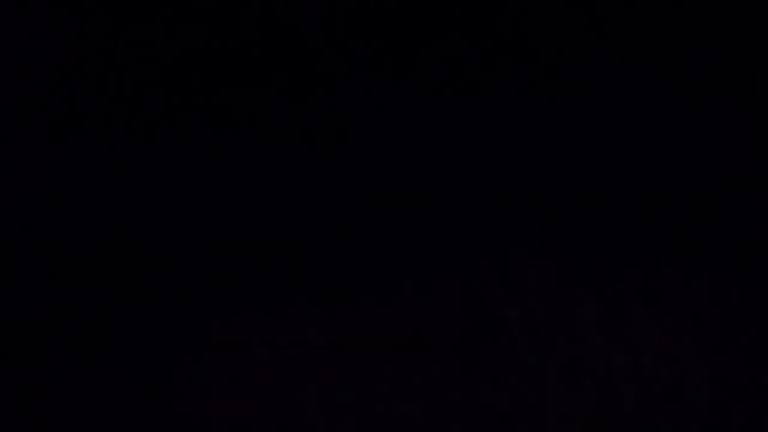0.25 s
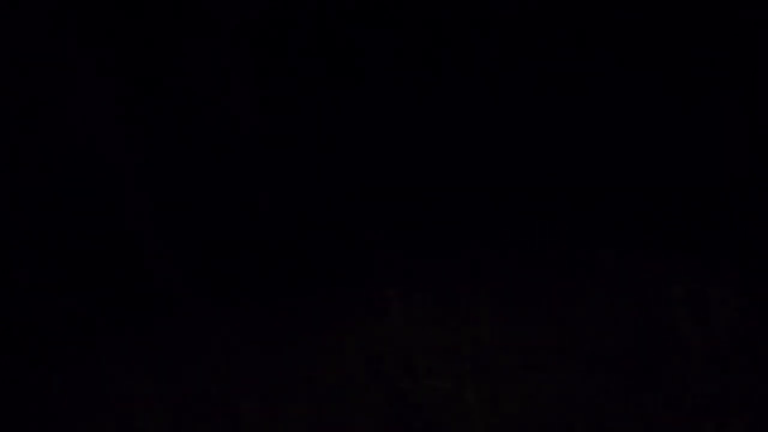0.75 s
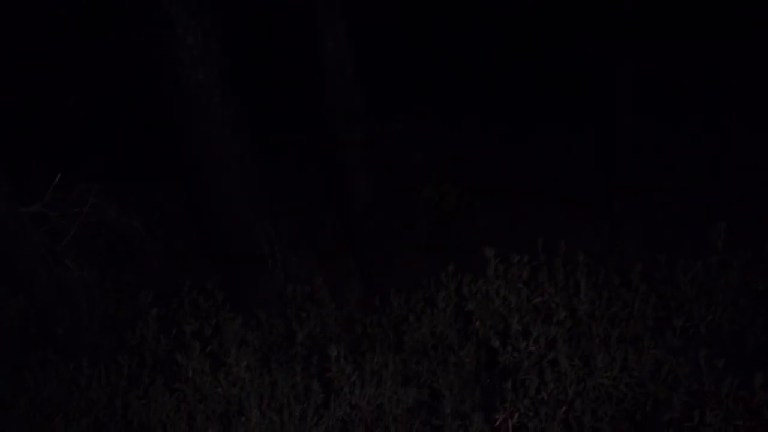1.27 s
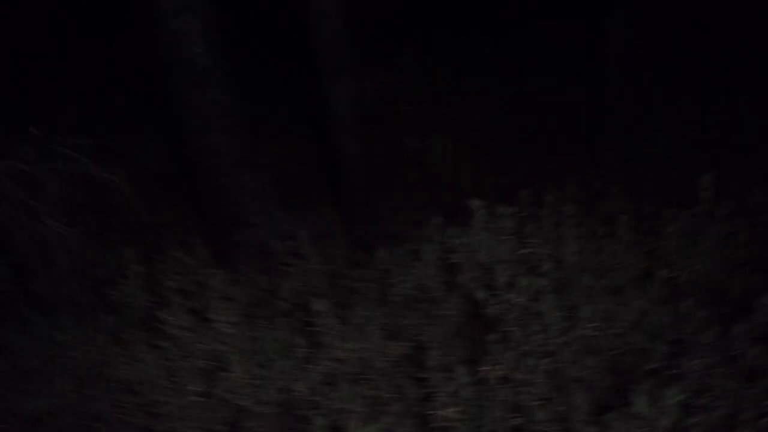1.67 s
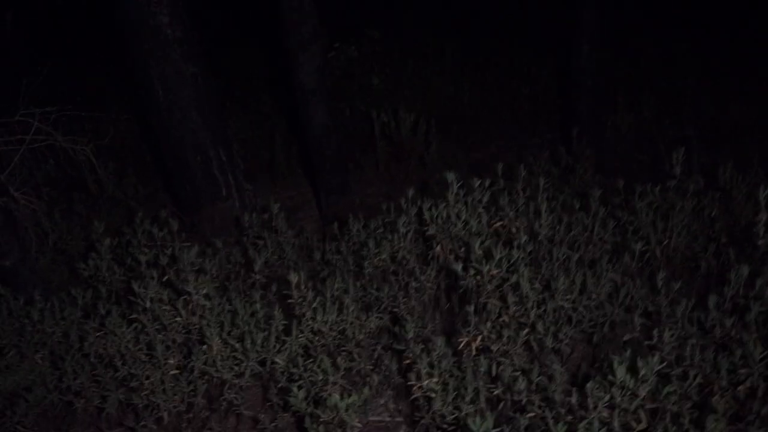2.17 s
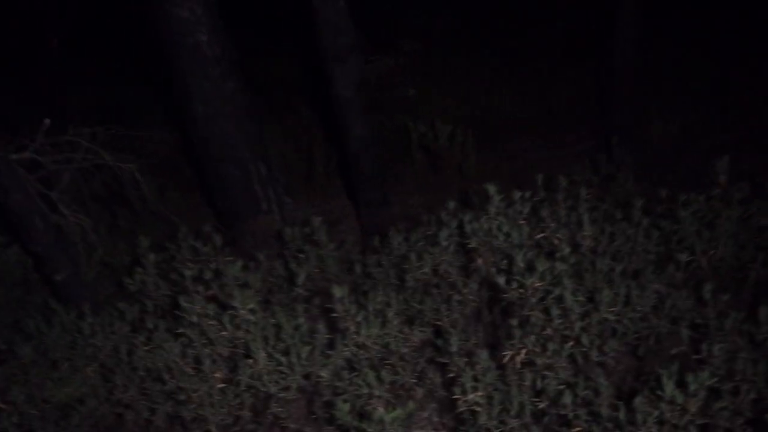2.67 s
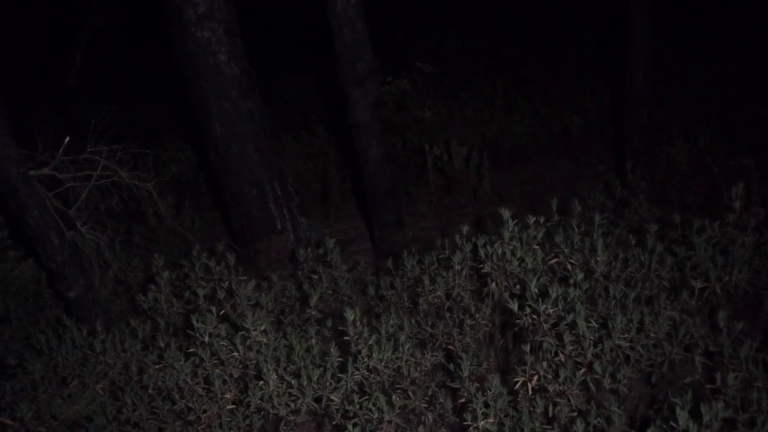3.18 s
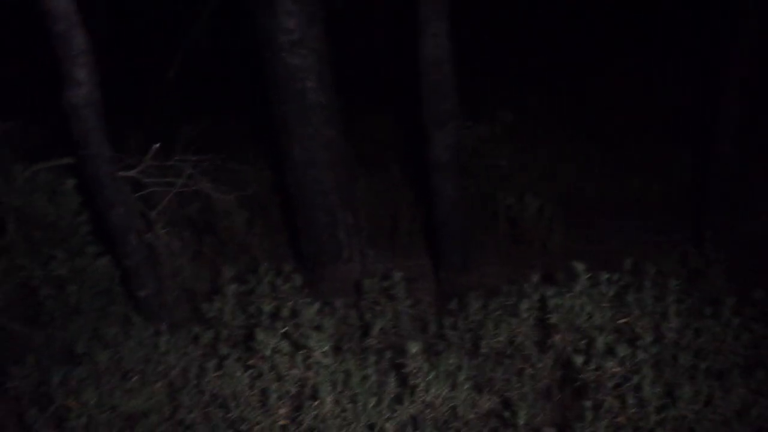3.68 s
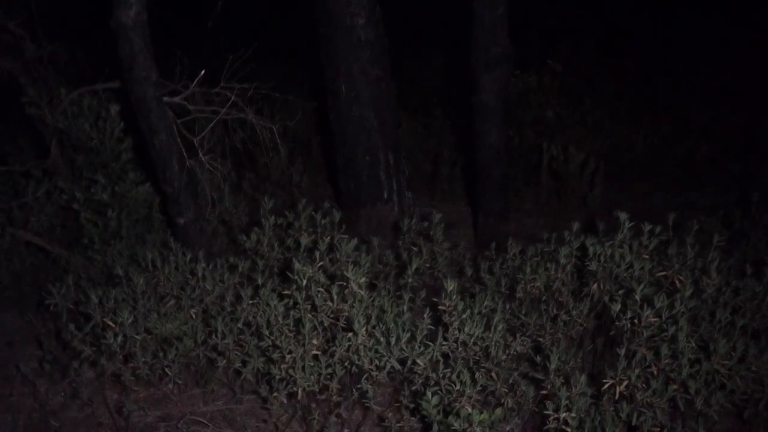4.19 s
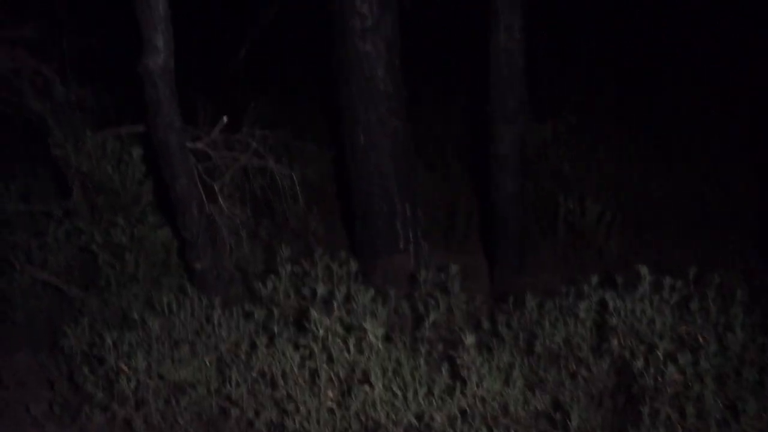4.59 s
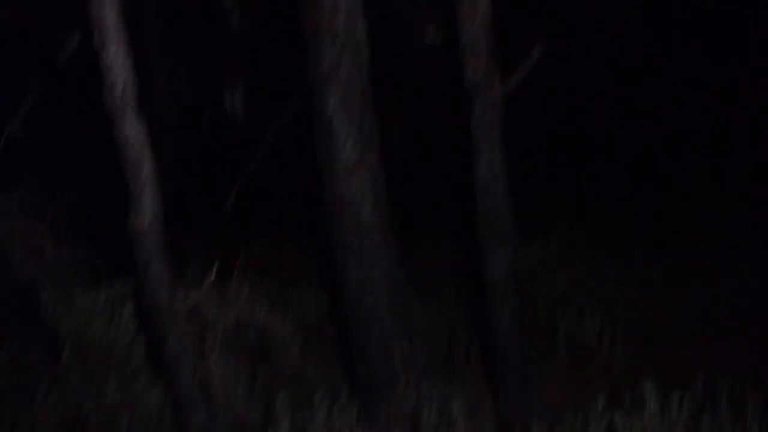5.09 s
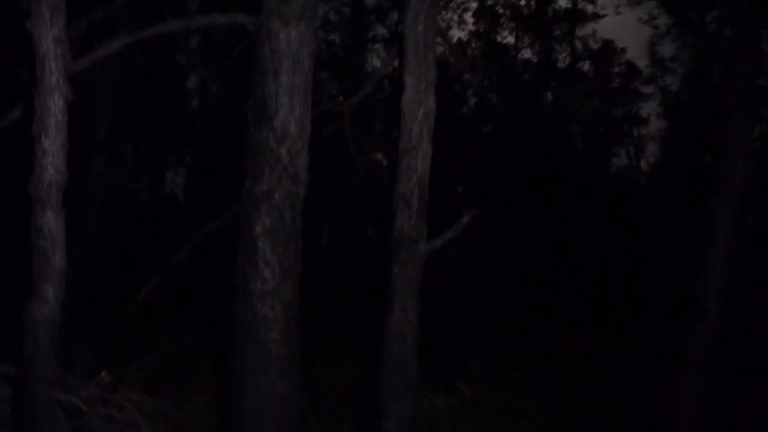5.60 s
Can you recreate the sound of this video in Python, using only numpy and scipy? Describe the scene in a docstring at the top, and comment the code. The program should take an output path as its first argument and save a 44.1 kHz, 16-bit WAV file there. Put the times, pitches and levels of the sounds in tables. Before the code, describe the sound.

Handheld camera thumps, knocks and plastic clicks in a quiet night forest, with faint leaf crackle over soft air hiss.

```python
"""Night steps in low brush, camera in hand

Someone steps slowly through low brush in a quiet forest at night, with the microphone in the hand-held camera.
Steps and shifts of grip thump through its body as low swings that sag in pitch; the hand trembles and rubs.
The plastic case knocks, clicks and rattles in short ringing modes, and hisses under a sliding finger.
Twigs and leaves crackle faintly as coloured random grains over air and hiss; trunks return a dull tail."""
import sys
import numpy as np
from scipy import signal
from scipy.fft import rfft, irfft, next_fast_len
from scipy.io import wavfile

SR = 44100
rng = np.random.default_rng(int(sys.argv[2]) if len(sys.argv) > 2 else 0)


def to_wav(sig):
    """Store sig (one row per channel, or 1-D mono) as 16-bit WAV at the path in sys.argv[1].

    Samples outside -1..1 are clipped; the rate is SR.
    """
    pcm = np.clip(np.atleast_2d(sig), -1, 1) * 32767
    pcm = np.round(pcm).astype(np.int16)
    wavfile.write(sys.argv[1], SR, pcm.T)  # frames by channels


N = 257929  # samples

# soft blows through the camera body:
# (time of the crest [s], pitch at the crest [Hz], level of the swing [dB], rise [s], fall by 60 dB [s])
THUMPS = [(0.097,190.4,-32,.019,0.084), (0.159,184,-23,0.0065,0.031), (0.564,192,-32,0.015,.055),
          (0.917,168,-37,0.012,0.079), (1.458,144,-31.5,0.0056,0.043), (1.648,175,-25,.022,0.028),
          (1.759,201,-19.5,0.021,0.093), (1.865,183,-16.5,0.0095,0.078), (1.889,195,-18.5,.018,.037),
          (1.921,203,-21.5,.017,0.051), (2.317,173.6,-30,.025,0.073), (2.472,174,-29.5,0.014,0.09),
          (2.609,66.8,-24.5,0.021,0.45), (2.899,68,-36.5,.06,0.76), (3.073,196,-21,.02,0.086),
          (3.091,143.2,-26,.03,0.21), (3.45,182,-34,0.0085,0.093), (3.672,181,-31,0.012,0.033),
          (3.721,195,-32,.017,0.038), (3.749,50.4,-37.5,0.055,0.37), (4.14,204,-18.5,0.0071,0.14),
          (4.231,175,-31.5,.02,.036), (4.279,180,-12,0.0038,0.047), (4.3,201,-16,.014,.081),
          (4.469,177,-32.5,.02,0.032), (4.519,230,-25.5,0.0045,.05), (4.719,205,-23.5,.018,0.053),
          (4.749,202,-14,0.0029,0.025), (4.772,195,-7.5,0.0052,0.019), (4.779,147,-21,0.0088,0.093),
          (4.794,188,-15,.018,0.07), (4.928,187,-11,.0041,0.023), (4.953,181,-20.5,0.016,0.045),
          (5.088,194,-20,0.0092,0.053), (5.305,197,-27.5,.013,0.033), (5.593,206,-29,.023,0.12),
          (5.677,189,-13,0.0029,0.05), (5.696,198.4,-3,0.015,0.036), (5.726,67.6,-25.5,0.025,0.098)]
# bands of a hard contact, in the order knock, clack, tick: (low edge [Hz], high edge [Hz])
KNOCK_CLACK_TICK_HZ = [(280, 1400), (1400, 4400), (4400, 15000)]

STILL_TREMOR_DB, STILL_DRONE_DB = -51, -53.5  # gains while the hand rests
QUICK_ATTACK_S = 0.014  # onset of a finger's stroke and of the settling after a blow


def from_db(db):
    """Turns decibels into an amplitude ratio."""
    return 10 ** (np.asarray(db) / 20)


def rms_one(x):
    """Scales a signal to an rms of 1."""
    return x / np.sqrt(np.mean(x ** 2) + 1e-20)


def coloured(x, points):
    """Gives a signal a smooth spectrum that falls away beyond its ends; rms 1."""
    hz, db = np.transpose(points)
    size = next_fast_len(N)
    f = np.maximum(np.arange(size // 2 + 1) * SR / size, 1)
    ends = np.minimum(f / hz[0], 1) ** 2 * np.minimum(hz[-1] / f, 1) ** 2
    curve = from_db(np.interp(np.log(f), np.log(hz), db))
    return rms_one(irfft(rfft(x, size) * ends * curve, size)[:N])


def drift(rate):
    """Slow chance with a spread of about 1, heading for a new random value `rate` times a second."""
    knots = rng.standard_normal(4000)
    return np.interp(np.arange(N) / SR * rate, np.arange(len(knots)), knots)


def grains(per_s, spread_db):
    """Random tiny slips or snaps of uneven size; rms 1."""
    born = rng.random(N) < per_s / SR
    size = from_db(spread_db * np.minimum(rng.exponential(1, N), 4))
    return rms_one(born * rng.standard_normal(N) * size)


def add(out, s, sound):
    """Mixes a sound in from a given time on."""
    i = int(np.clip(round(s * SR), 0, N - 1))
    out[i:i + len(sound)] += sound[:N - i]


def gestures(rows, attack_s, t60_s):
    """Gain per sample of (start, length, dB) moves: each swells, holds and dies away; powers add."""
    t, power = np.arange(N) / SR, np.zeros(N)
    for s, length, db in rows:
        i = int(np.clip((s - attack_s) * SR, 0, N))
        j = int(np.clip((s + length + 2 * t60_s) * SR, i, N))
        swell = np.clip(1 + (t[i:j] - s) / attack_s, 0, 1)
        since_release = np.maximum(t[i:j] - s - length, 0)
        power[i:j] += (swell * from_db(db - 60 * since_release / t60_s)) ** 2
    return np.sqrt(power)


def air():
    """Still night air and microphone hiss: steady noise with most of its strength in the mids."""
    # spectrum: (frequency [Hz], level [dB])
    colour = [(150,-22), (300,-3), (500,3.5), (800,-2), (1500,-1), (2200,-7.5), (3700,-11), (8400,-15),
              (15200,-20), (16000,-29)]
    return from_db(-58) * coloured(rng.standard_normal(N), colour)


def grip(attack_s=0.051, t60_s=0.33, settle_db=-24, settle_t60_s=0.22):
    """Gains of tremor and drone: a resting level and shifts of hold; the drone also settles after each blow."""
    # the hand shifts its hold: (start [s], length [s], tremor gain [dB], drone gain [dB])
    shifts = np.array([(0,0.4,-37.5,-44), (1.204,0.018,-50,-50), (1.621,0.095,-38.5,-40.5),
                       (1.894,0.038,-33.5,-32), (2.091,0.041,-44,-44), (2.285,0.077,-43.5,-46),
                       (2.524,0.17,-43.5,-42.5), (2.725,0.25,-43.5,-48.5), (3.077,0.024,-37,-43),
                       (3.684,0.15,-54,-68), (4.317,0.068,-35,-45), (4.55,0.25,-49.5,-39),
                       (4.753,0.21,-36,-36), (5.03,0.095,-44,-41), (5.255,0.063,-39.5,-39),
                       (5.393,0.045,-46,-47), (5.54,0.033,-45,-45), (5.703,0.028,-32.5,-58)])
    after_blows = [(s, 0, db + settle_db) for s, _, db, _, _ in THUMPS]
    settling = gestures(after_blows, QUICK_ATTACK_S, settle_t60_s)
    tremor = np.hypot(gestures(shifts[:, [0, 1, 2]], attack_s, t60_s), from_db(STILL_TREMOR_DB))
    drone = np.hypot(gestures(shifts[:, [0, 1, 3]], attack_s, t60_s), from_db(STILL_DRONE_DB))
    return tremor, np.hypot(drone, settling)


def hand(tremor, drone, tremor_db=-2, drone_db=-1, waver_db=5.0, friction_db=-12, catch_db=3):
    """The grip trembles and keeps the body droning; the skin rubs in uneven catches and now and then scuffs."""
    # spectra of tremor, body drone and rubbing skin: (frequency [Hz], level [dB])
    tremor_colour = [(15, -0.5), (30, -2), (45, -2), (65, -4), (90, -8.5), (130, -5), (250, -64)]
    drone_colour = [(60, -30), (100, -17), (140, 2), (165, -8), (192, -2), (230, -5.5), (300, -19),
                    (500, -39)]
    friction_colour = [(150, -7.5), (330, 0.5), (500, -4), (800, -9), (1200, -15), (2500, -26), (6000, -33),
                       (14000, -42)]
    # scuffs of the palm: (time of the crest [s], gain [dB])
    scuff_rows = [(0.018,-46.5), (0.128,-42), (0.24,-39), (0.29,-42.5), (0.343,-41), (1.368,-51),
                  (1.455,-41), (1.62,-54), (2.6,-44), (2.715,-51), (2.856,-46.5), (5.588,-45)]
    half_width_s = 0.0068
    shake = from_db(tremor_db) * tremor * coloured(rng.standard_normal(N), tremor_colour)
    waver = from_db(drone_db + waver_db * drift(25))
    body = waver * drone * coloured(rng.standard_normal(N), drone_colour)
    t = np.arange(N) / SR
    scuffs = sum(from_db(db) * np.exp(-((t - s) / half_width_s) ** 2 / 2) for s, db in scuff_rows)
    rubbing = from_db(friction_db + catch_db * drift(76)) * drone + scuffs
    return shake + body + rubbing * coloured(grains(per_s=5000, spread_db=2.0), friction_colour)


def brush(tremor, stir_db=-63.5, stir_follows=0.23, clump_db=4.0):
    """Leaves and twigs brush past in clumps of fine crackle, stirring even at rest and more as the hand trembles."""
    # sleeve and brush sweep past: (start [s], length [s], gain [dB])
    sweeps = [(0,0.5,-69), (5.25,0.052,-55), (5.45,0.027,-54.5), (5.545,0.043,-50), (5.8,0.035,-63)]
    # spectrum of the leaves: (frequency [Hz], level [dB])
    leaf_colour = [(700, -21), (1400, 13), (2400, 7.5), (4500, -1.5), (6700, -3), (9000, -7), (12000, -11),
                   (16000, -37)]
    # stir_follows is the share of the tremor's swing in dB that the leaves take up
    stir = from_db(stir_db) * (tremor / from_db(STILL_TREMOR_DB)) ** stir_follows
    level = np.hypot(stir, gestures(sweeps, attack_s=.04, t60_s=0.2))
    clumps = from_db(clump_db * drift(60))
    return level * clumps * coloured(grains(per_s=2500, spread_db=1.5), leaf_colour)


def thumps(sag=0.035, sag_s=0.0047, overtone=2.4, overtone_db=-26):
    """A soft push swells the body's low swing and rocks the camera; the pitch sags as the hand gives and damps it."""
    rock_hz, rock_db, rock_t60_s = 66.9, -18, .13  # the whole camera in the hand; dB against the blow
    out = np.zeros(N)
    for s, hz, db, rise, t60 in THUMPS:
        t = np.arange(-int(rise * SR), int((max(t60, rock_t60_s) + rise) * SR)) / SR
        swell = np.cos(np.pi * np.minimum(t, 0) / rise / 2) ** 2
        fall_s = np.hypot(np.maximum(t, 0), rise / 2) - rise / 2  # a rounded crest, then a steady fall
        envelope = swell * from_db(-60 * fall_s / t60)
        angle = 2 * np.pi * np.cumsum(hz * (1 - sag * np.tanh(t / sag_s))) / SR
        swing = envelope * np.sin(angle)
        swing = swing + from_db(overtone_db) * envelope ** 2 * np.sin(overtone * angle)
        rock_envelope = swell * from_db(rock_db - 60 * fall_s / rock_t60_s)
        rock = rock_envelope * np.sin(2 * np.pi * rock_hz * (t - t[0]))
        add(out, s + t[0], from_db(db) * (swing + rock))
    return out


def case(x):
    """The plastic case lifts, or slightly dips, whatever excites it at each of its resonances."""
    # resonances: (frequency [Hz], width [Hz], lift [dB])
    resonances = [(413, 32, 13.5), (703, 110, 8.5), (868, 36, 8), (1096, 39, 6), (1260, 20, -1),
                  (1670, 61, 6), (2030, 210, 3.5), (2380, 61, 4.5), (2990, 240, 3), (4480, 470, -1),
                  (5560, 520, 1), (6800, 700, 4), (8600, 420, 2)]
    for hz, width_hz, lift_db in resonances:
        b, a = signal.iirpeak(hz, hz / width_hz, fs=SR)
        x = x + (from_db(lift_db) - 1) * signal.lfilter(b, a, x)
    return x


def strikes(rows, chatter=0.16, chatter_t60=0.015, soft_hz=4500, ring_rise_s=0.0008, partner=1.077, partner_db=-8):
    """Each strike snaps and chatters into the case, rings two close modes of the part and wakes the case's hollow."""
    out, t = np.zeros(N), np.arange(SR // 8) / SR
    bands = [signal.butter(2, edges, "band", fs=SR, output="sos") for edges in KNOCK_CLACK_TICK_HZ]
    span = .005 * SR  # a band's level is its rms over 5 ms
    hollow_hz, hollow_db, hollow_t60_s = 412.6, -2, .04  # dB against the knock
    hollow = from_db(hollow_db - 60 * t / hollow_t60_s) * np.sin(2 * np.pi * hollow_hz * t)
    ring_rise = 1 - np.exp(-t / ring_rise_s)
    for s, hz, ring_db, t60, *band_db in rows:
        force = chatter * rng.standard_normal(len(t)) * from_db(-60 * t / chatter_t60)
        force[0] += 1  # the snap
        shell = case(signal.lfilter(*signal.butter(1, soft_hz, fs=SR), force))
        modes = np.sin(2 * np.pi * hz * t) + from_db(partner_db) * np.sin(2 * np.pi * hz * partner * t)
        ring = from_db(ring_db - 60 * t / t60) * modes
        sound = (ring + from_db(band_db[0]) * hollow) * ring_rise
        for k, (band, db) in enumerate(zip(bands, band_db)):
            part = signal.sosfilt(band, shell)
            sound = sound + (-1) ** k * from_db(db) * part * np.sqrt(span / np.sum(part ** 2))
        add(out, s, sound)
    return out


def contacts():
    """Hard contacts strike the case, each with its own ring and share of knock, clack and tick."""
    # (time [s], ring pitch [Hz], ring level [dB], ring fall by 60 dB [s], knock [dB], clack [dB], tick [dB])
    contact_rows = [(0.7943,2030,-28.5,0.006,-67,-70,-44), (0.8766,5900,-24,0.0045,-55,-50.5,-48),
                    (1.7438,900,-26.5,0.063,-37.5,-69,-58), (1.7445,1280,-33.5,0.047,-53,-66,-62),
                    (1.8559,1030,-13,.01,-17.5,-33,-38), (1.862,1055,-30,.013,-23.5,-46,-59),
                    (1.873,1150,-18,0.047,-17.5,-63,-48), (1.898,850,-30,.018,-54,-44,-54),
                    (1.906,761,-6,0.044,-33,-41.5,-49), (1.9085,1115,-16.5,0.036,-23.5,-60,-58),
                    (2.6328,900,-25.5,0.017,-31.5,-52,-66), (3.051,826,-10,0.0094,-38,-35,-40.5),
                    (3.0529,389,-30.5,0.14,-41,-62,-64), (3.062,930,-19,0.014,-56,-64,-42),
                    (3.068,767,-25.5,0.046,-34.5,-54,-46), (3.7227,1220,-25,.01,-72,-37,-53),
                    (3.743,1290,-22.5,0.023,-70,-41,-56), (4.113,1370,-31,0.03,-58,-62,-71),
                    (4.134,400,-29,0.038,-42,-56,-72), (4.275,930,-24.5,0.034,-30,-33.5,-42.5),
                    (4.284,370,-22.5,0.022,-32.5,-42,-65), (4.5144,840,-23,.016,-17.5,-33.5,-27.5),
                    (4.516,500,-19,0.025,-26,-53,-57), (4.603,533,-24,0.02,-36,-65,-68),
                    (4.702,716,-30,.011,-42.5,-47,-54), (4.746,2140,-8,0.014,-24,-23,-19.5),
                    (4.7467,1120,-8,0.016,-26,-36,-44), (4.7671,2140,1,0.0081,-23,-17.5,-32),
                    (4.8612,1120,-19.5,0.014,-47,-28.5,-54), (4.879,2100,-18,.012,-38,-29.5,-50),
                    (4.924,693,-23,0.059,-24,-28,-52), (4.9581,2880,-24,.012,-42,-52,-51),
                    (5.0797,1410,-45,.014,-41,-50,-73), (5.303,1280,-42,0.015,-42,-51,-57),
                    (5.6742,1466,-10,0.011,-32,-27.5,-68), (5.677,312,-13.5,0.043,-26,-47,-50)]
    return strikes(contact_rows)


def rattles(ring_hz=4330, ring_t60_s=0.013):
    """A small loose part rattles against the case in a quick burst near 4.55 s, and a few faint ticks sound at
    other moments; all share the same high, short ring."""
    # (time [s], ring level [dB])
    rattle_rows = [(2.131,-42), (3.304,-42), (3.8595,-46), (4.5335,-27), (4.5409,-16.5), (4.5595,-19),
                   (4.5796,-15), (4.5904,-25), (5.04,-40), (5.718,-40)]
    # knock, clack and tick [dB against the ring]
    band_db = [-23, -21, -24.5]
    return strikes([(s, ring_hz, db, ring_t60_s, *np.add(db, band_db)) for s, db in rattle_rows])


def forest(x, echo_db=-27, t60=1.0, dull_hz=2500):
    """Trunks scatter back a faint, dull tail: band-limited noise that swells in briefly and dies away."""
    t = np.arange(int(.8 * SR)) / SR
    scatter = rng.standard_normal(len(t)) * from_db(-60 * t / t60) * np.minimum(t / 0.021, 1)
    band = signal.butter(2, [600, dull_hz], "band", fs=SR, output="sos")
    tail = signal.sosfilt(band, scatter / np.linalg.norm(scatter))
    return from_db(echo_db) * signal.fftconvolve(x, tail)[:N]


def slide(ring_db=-2, hiss_db=-5):
    """Dense little slips of skin on plastic hiss and keep a panel ringing."""
    # strokes of a finger on the case: (start [s], length [s], gain [dB])
    strokes = [(3.727,.018,-50), (4.53,.06,-51.5), (4.751,0.061,-28), (4.831,0.0034,-30),
               (4.868,0.022,-35.5), (4.9,0.031,-34), (4.95,0.043,-53.5), (5.04,0.021,-46)]
    # spectrum of the hiss: (frequency [Hz], level [dB])
    hiss_colour = [(350, -32), (560, 0), (900, 7), (1600, 3.5), (2300, 4), (3200, -2.5), (4500, -11),
                   (6800, -34), (8000, -19), (16000, -42)]
    # resonances of the panel: (frequency [Hz], width [Hz], relative level [dB])
    panel = [(900, 180, -3), (1026, 24, -1), (1226, 100, -4.5), (1660, 34, -10), (2030, 48, -3),
             (2190, 67, 2.5), (2550, 42, -9), (3200, 150, -7.5), (5100, 120, -14), (6700, 1400, -22)]
    level = gestures(strokes, QUICK_ATTACK_S, t60_s=0.041)
    slips = grains(per_s=6000, spread_db=1.0)
    ringing = np.zeros(N)
    for k, (hz, width_hz, db) in enumerate(panel):
        b, a = signal.iirpeak(hz, hz / width_hz, fs=SR)
        ringing += (-1) ** k * from_db(db) * signal.lfilter(b, a, slips)
    hiss = from_db(hiss_db) * coloured(slips, hiss_colour)
    return level * (from_db(ring_db) * rms_one(ringing) + hiss)


def scene():
    """Everything sounds at or near the one microphone; only the plastic sounds are echoed by the forest."""
    tremor, drone = grip()
    plastic = contacts() + rattles() + slide()
    handling = hand(tremor, drone) + thumps() + plastic
    surroundings = air() + brush(tremor) + forest(plastic)
    return (handling + surroundings)[None]


def record(dry, ceiling=1.0, cutoff_hz=16300):
    """The highest peaks are rounded and the top of the spectrum is cut."""
    held = dry / (1 + (dry / ceiling) ** 4) ** (1 / 4)
    return signal.sosfilt(signal.ellip(10, .2, 80, cutoff_hz, fs=SR, output="sos"), held)


dry = scene()
out = record(dry)
to_wav(out)
```